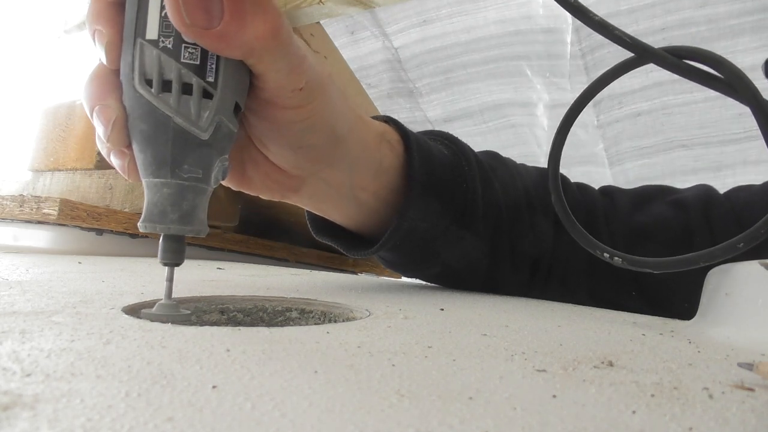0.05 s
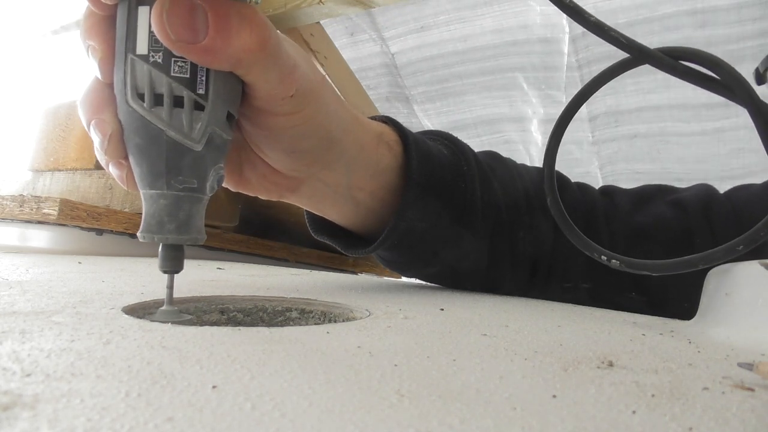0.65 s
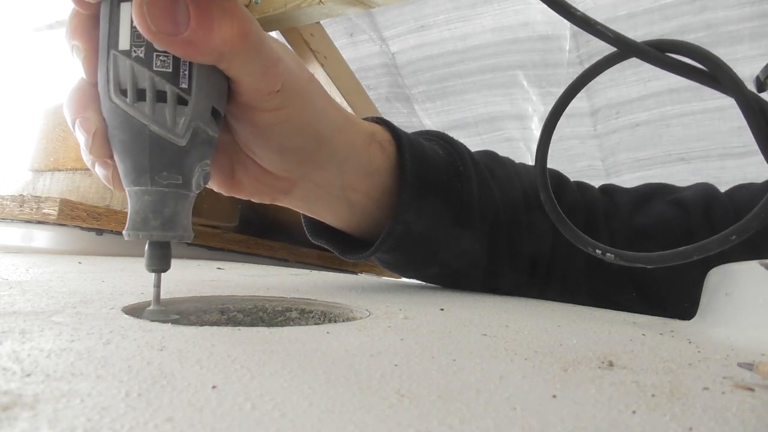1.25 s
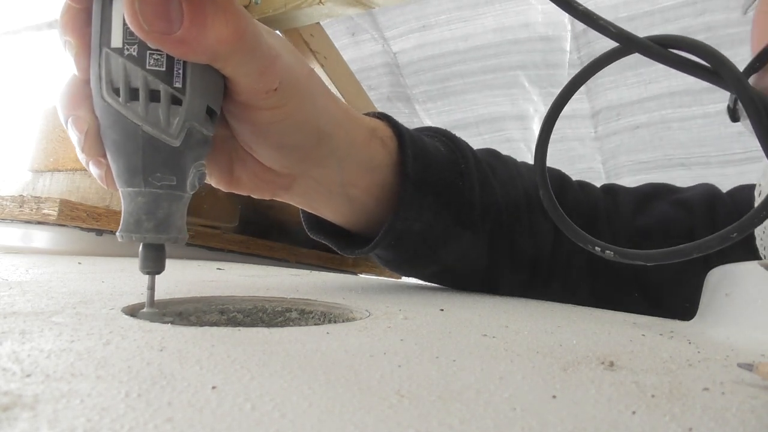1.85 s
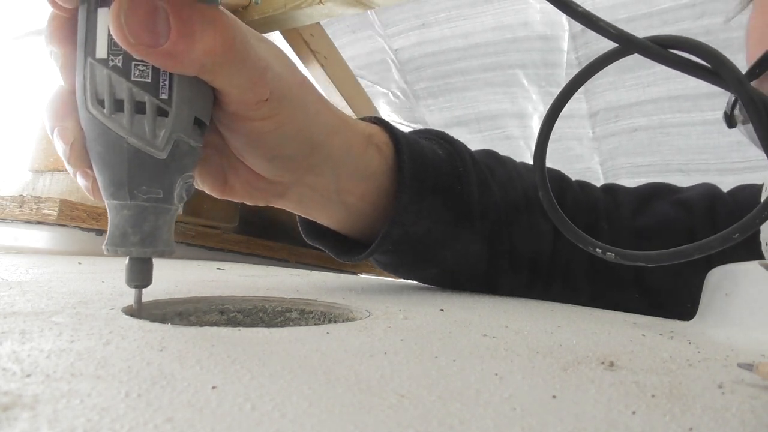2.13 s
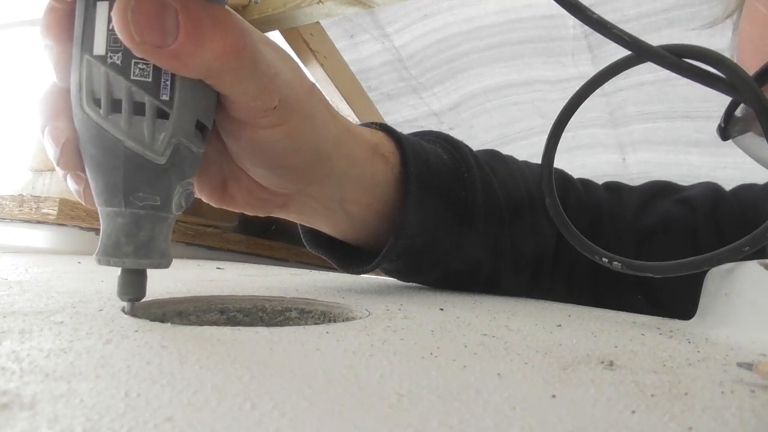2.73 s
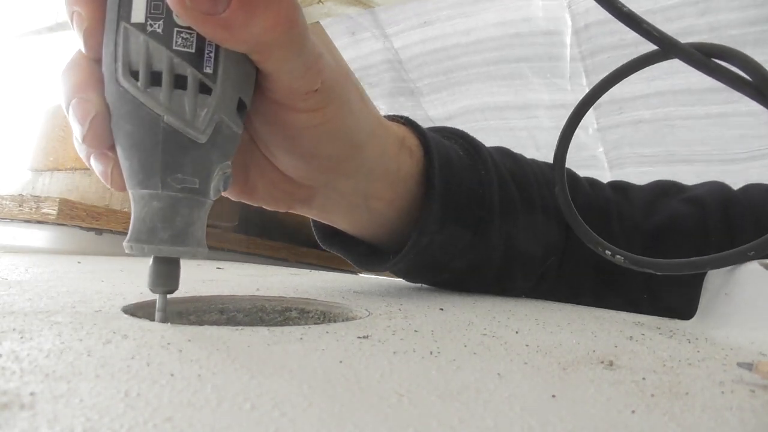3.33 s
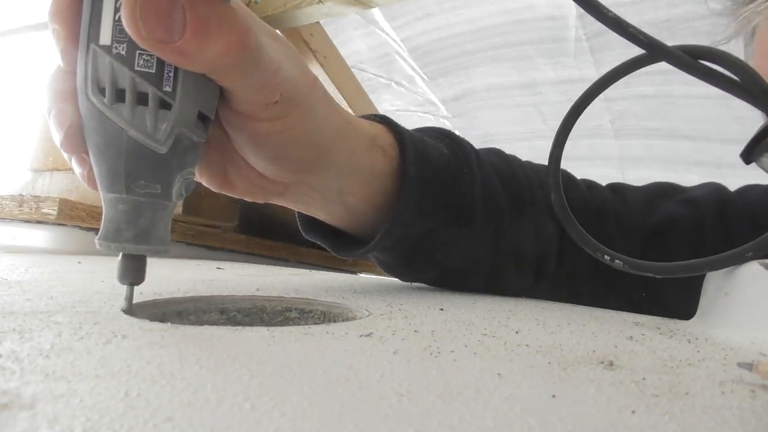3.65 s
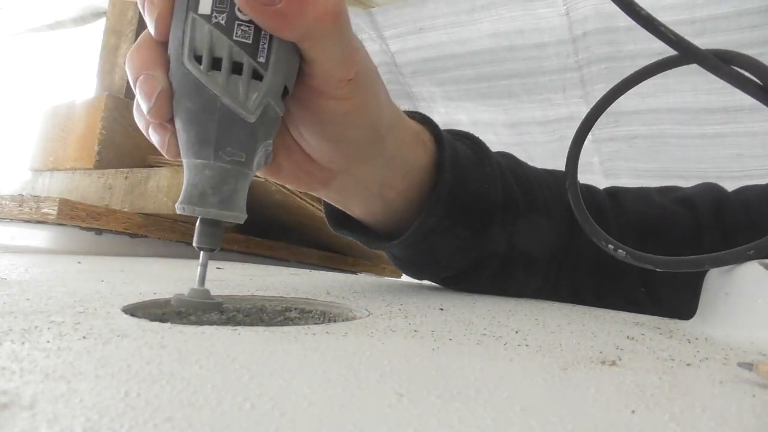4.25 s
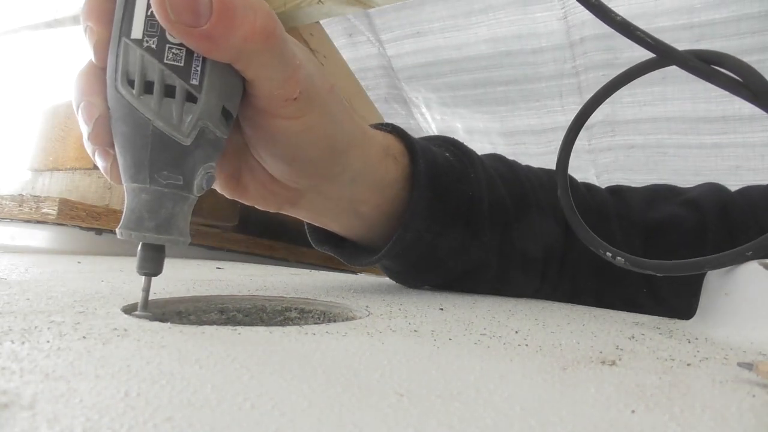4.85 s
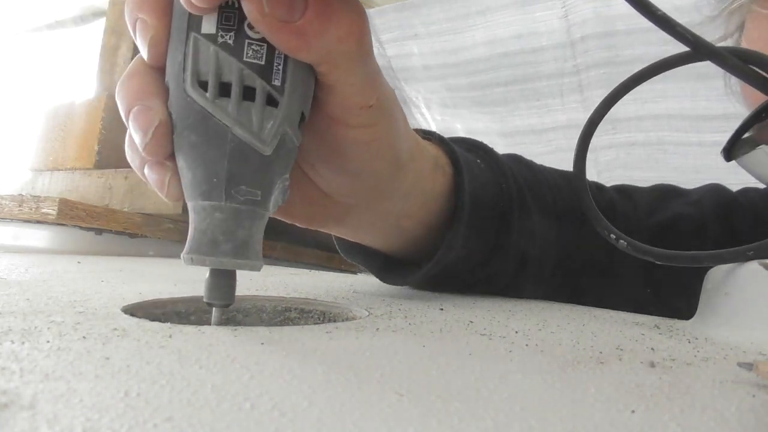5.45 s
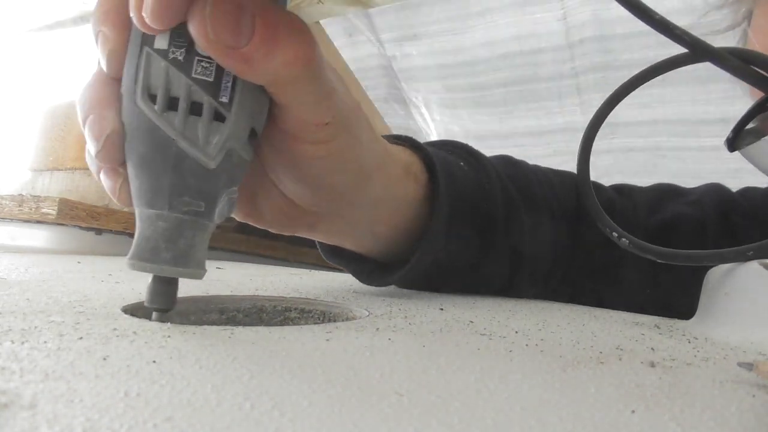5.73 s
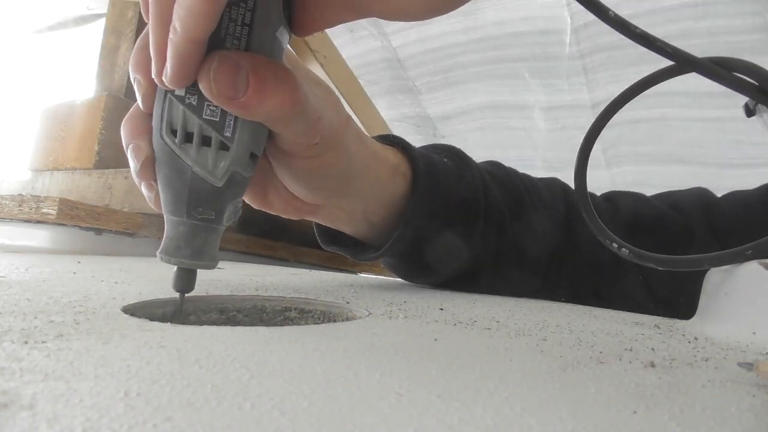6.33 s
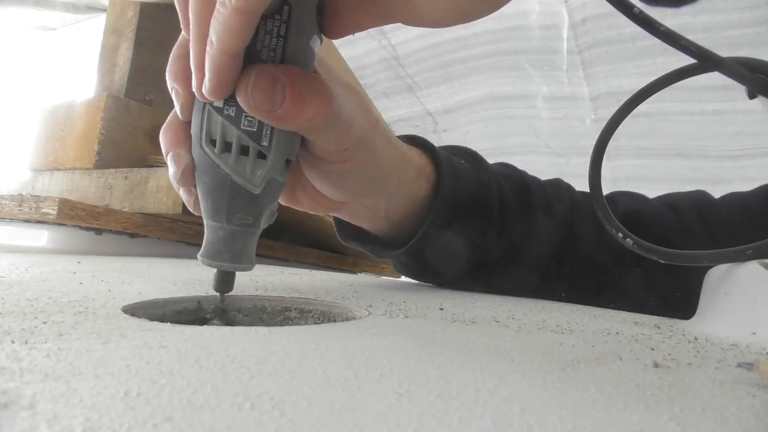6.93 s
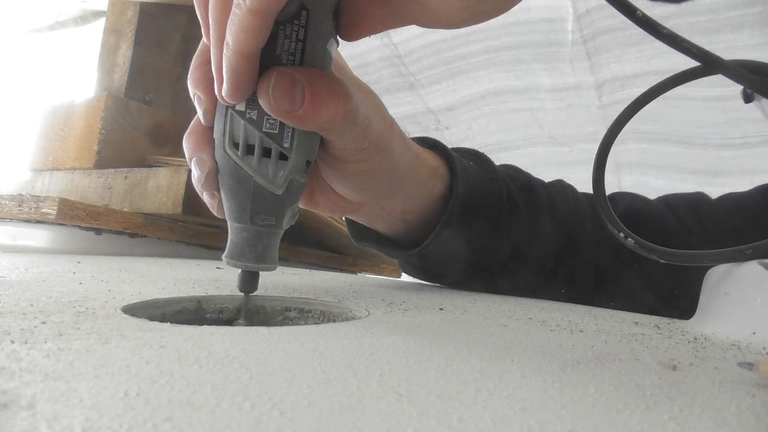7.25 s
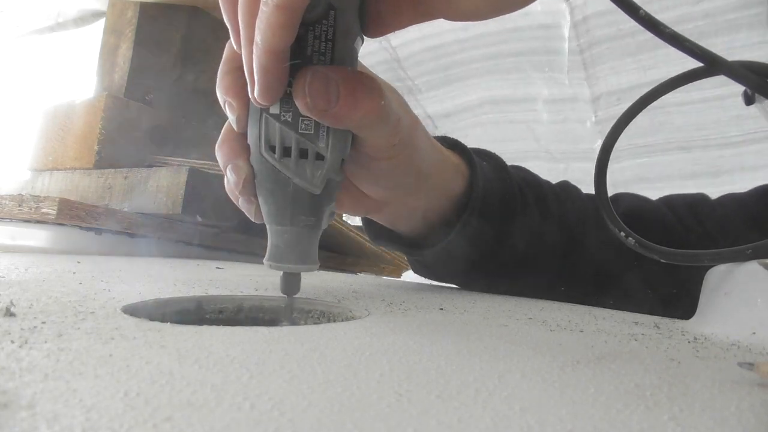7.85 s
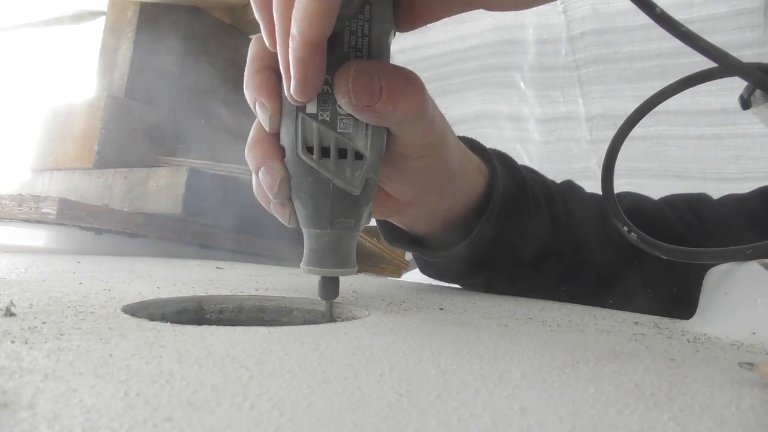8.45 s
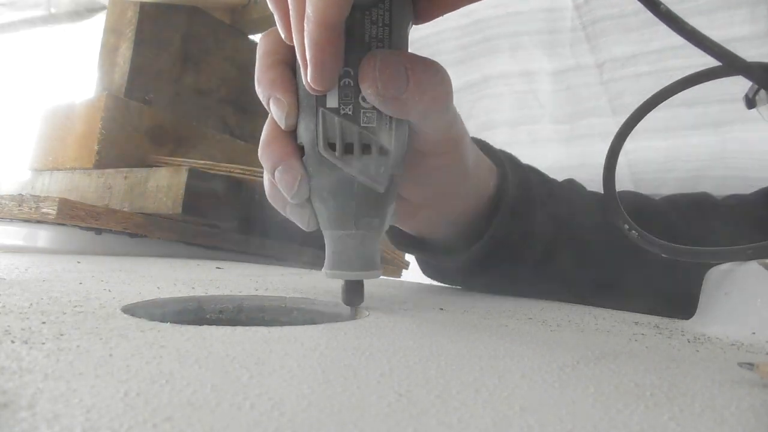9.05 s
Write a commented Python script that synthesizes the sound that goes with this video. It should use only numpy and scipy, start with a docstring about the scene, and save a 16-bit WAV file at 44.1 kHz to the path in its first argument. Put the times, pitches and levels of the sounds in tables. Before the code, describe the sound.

A handheld rotary tool grinds the rim of a hole in fibreglass, with a high motor whine, a low hum and a gritty rasp. Its cooling air rumbles on the close microphone, with a few dull bumps. After nearly two seconds the sound is abruptly sped up, becoming a shrill whistle that sags and screeches at each bite and then recovers, over fine hiss and a fluttering rush of air.

```python
"""Rotary tool grinding fibreglass

A burr grinds the rim of a hole in a deck, the microphone sitting in the tool's cooling air.
The shaft hums and sags under load, the motor whines, the burr rasps grit off the rim.
After 1.73 s time runs eight times faster: the hum becomes a whistle that sags at each bite
and recovers after it, and the air rumble becomes a fluttering rush."""
import sys
import numpy as np
from scipy import signal
from scipy.fft import rfft, irfft
from scipy.io import wavfile
from scipy.ndimage import uniform_filter1d

SR = 44100
rng = np.random.default_rng(int(sys.argv[2]) if len(sys.argv) > 2 else 0)


def pcm_store(signal):
    """Save signal as 16-bit PCM."""
    levels = np.round(np.clip(np.atleast_2d(signal), -1, 1) * 32767)
    wavfile.write(sys.argv[1], SR, levels.astype(np.int16).T)


N = 400428
TIME = np.arange(N) / SR
LEFT_RIGHT = np.array([[1], [-1]])
JUMP_S, SPEED_UP = 1.728, 8  # real time gives way to fast time
MOTOR_ORDER, BEARING_ORDER = 18, 2.55  # cycles per turn of the shaft
FREE_HZ, TOP_HZ = 4031, 15900  # unloaded shaft in fast time; treble limit

# Bites of the burr in fast time; the orders grow by the last column up to their relative levels:
# (time [s], length [s], sag [Hz], first order [dB], second order [dB],
# orders 3, 4 and 6 together [dB], fifth order [dB], growth [dB])
BITES = [(1.78, 0.093, 1560, -37, -41.0, -49, -54, -8), (1.868, 0.11, 1173, -38, -42, -47, -51.0, 2),
         (2.041, 0.19, 1203, -37, -43, -51, -47, -2), (2.21, 0.091, 1350, -34.5, -36, -40, -46, -10),
         (2.327, 0.12, 1082, -34.5, -27, -33.0, -32.5, 8.5),
         (2.436, 0.027, 1547.0, -39.5, -33.5, -42, -49, 12),
         (2.574, 0.198, 1524, -32.5, -32, -33.5, -37.5, 8), (2.776, 0.09, 1447.0, -43, -37.5, -41, -46, -5),
         (2.887, 0.16, 1467, -41, -30, -35, -39.0, 6), (3.081, 0.13, 1530, -44.5, -22.5, -25.5, -30.5, 5.5),
         (3.226, 0.11, 937, -48, -23.0, -25, -27, 5), (3.351, 0.3, 1206.0, -42, -30, -32.5, -31, -1.5),
         (3.694, 0.158, 743, -38, -25.0, -21.5, -29, 3.5),
         (3.842, 0.112, 1950, -45.5, -33.5, -29.5, -38, 1), (4.748, 0.14, 249, -37.5, -43.5, -42, -48.0, 3),
         (5.237, 0.046, 387, -47, -45, -36, -48.0, -3), (5.308, 0.11, 834.0, -51, -37, -47, -41.5, 1),
         (5.424, 0.11, 1695, -42.5, -32, -27, -32.5, 2.5), (5.59, 0.16, 1119, -45.5, -34.5, -42, -40.5, -2),
         (5.733, 0.12, 1004, -42.5, -35, -35, -34.5, 4),
         (5.874, 0.14, 1238, -42, -36.5, -33.5, -37.5, -2.5),
         (6.054, 0.191, 1337, -41.5, -36.5, -37, -37, 0.5), (6.255, 0.064, 1496, -36, -38, -33.5, -37, -3),
         (6.32, 0.21, 1376, -33.0, -31.5, -36, -35.5, 0),
         (6.584, 0.036, 1081.0, -39.0, -33.0, -33.5, -44.0, -16),
         (6.668, 0.15, 1339, -38.5, -33.5, -36, -37.5, 2), (6.879, 0.139, 1355, -32, -29.5, -35, -30.5, 0),
         (7.026, 0.3, 1385, -32, -29.5, -42, -31.0, 1.0), (7.327, 0.12, 1597, -27.5, -28, -51, -45, -7),
         (7.471, 0.054, 1842, -27, -24.5, -41, -34.5, -12), (7.59, 0.116, 1188, -39, -31, -34, -32, 8),
         (7.694, 0.107, 1590, -31.5, -33, -37.5, -38, -2.5), (7.811, 0.1, 1525, -32.5, -33, -36.5, -32, -2),
         (7.925, 0.28, 1499, -32.5, -25, -34, -25.5, 3.5),
         (8.246, 0.34, 1338, -38, -28.5, -32.5, -32.0, 7.5),
         (8.546, 0.043, 1710, -39.5, -33.5, -39, -30.5, -5),
         (8.628, 0.183, 1504, -42, -33.5, -36, -31.5, -1.5),
         (8.817, 0.062, 1800, -33.5, -41.5, -35.0, -33.0, 9),
         (8.881, 0.19, 1682, -40.5, -32.5, -35, -32.5, -1.5)]


def undb(db):
    """Decibels to gain."""
    return 10 ** (np.asarray(db) / 20)


def curve(table):
    """Breakpoints joined into a line over time."""
    return np.interp(TIME, *np.transpose(table))


def at(table, hz, column=1):
    """One column of a table, read on a log-frequency axis."""
    rows = np.array(table, float)
    return np.interp(np.log(np.maximum(hz, 1)), np.log(rows[:, 0]), rows[:, column])


def gate(start, length, rise, fall):
    """Attack, hold and release between 0 and 1."""
    return np.clip(np.minimum((TIME - start) / rise + .5, (start + length - TIME) / fall + .5), 0, 1)


def resonance(hz, centre_hz, width_hz, lift_db):
    """A bell-shaped boost in dB."""
    return lift_db / (1 + (2 * (hz - centre_hz) / width_hz) ** 2)


def walk(rate):
    """Smooth random drift of spread 1, with rate new values a second."""
    hold = max(int(SR / rate), 16)
    steps = rng.standard_normal(N // 16 + 1)[:N // hold + 1]
    drift = uniform_filter1d(uniform_filter1d(np.repeat(steps, hold), hold), hold)[:N]
    return drift / drift.std()


def flutter(depth, rate):
    """Complex gain of mean power 1: uneven contact shakes a tone's level and phase."""
    return (1 + depth * (walk(rate) + 1j * walk(rate))) / np.sqrt(1 + 2 * depth ** 2)


def noise(colour, band=(0, SR), texture=1):
    """Textured noise with a colour (dB as a function of Hz), rms 1 inside the band."""
    hz = np.arange(N // 2 + 1) * SR / N
    bins = rfft(rng.standard_normal(N) * texture) * undb(colour(hz))
    inside = (hz > band[0]) & (hz < band[1])
    return irfft(bins, N) * N / np.sqrt(2 * np.sum(abs(bins[inside]) ** 2))


def background_rumble():
    """A faint bed around 80 Hz, different at each microphone port."""
    ports = [noise(lambda hz: -3 * np.log2((hz + 1) / 80) ** 2) for _ in range(2)]
    return undb(-62.5 + 2 * walk(27)) * np.array(ports)


def thumps(pitch_hz=97, decay_s=0.0044):
    """Air and handling bump the microphone: heavily damped low swings of pressure."""
    # Dull bumps: (time [s], level [dB])
    bumps = [(0.176, -15), (.302, -15.5), (0.402, -16), (1.104, -9.5), (8.43, -33)]
    ages = [(np.maximum(TIME - s, 0), db) for s, db in bumps]
    return sum(undb(db) * np.sin(2 * np.pi * pitch_hz * age) * np.exp(-age / decay_s) for age, db in ages)


def air(pace, band, eddy_db, eddy_hz, mid_db, side_db):
    """Eddies buffet the two ports, mostly in opposite phase; pace scales their pitch and rate."""
    # Turbulence spectrum at pace 1: (frequency [Hz], relative level [dB])
    air_colour = [(6, -20), (16, -12.5), (30, -4), (70, 0.5), (130, -1), (220, -6), (380, -14), (700, -22),
                  (1500, -55)]
    eddies = undb(eddy_db * 2 * np.tanh(walk(eddy_hz * pace) / 2))
    mid, side = (noise(lambda hz: at(air_colour, hz / pace), band, eddies) for _ in range(2))
    return undb(mid_db) * mid + undb(side_db) * side * LEFT_RIGHT


def air_rumble():
    """Real time: cooling air rumbles on the microphone until the stream swings away."""
    away = np.clip((TIME - 1.31) / 0.11, 0, 1)
    rumble = air(0.776, (25, 250), eddy_db=4.5, eddy_hz=24.04, mid_db=1.5, side_db=12)
    return undb(-38.5 - 28 * away) * rumble


def air_rush(speed_hz, travel):
    """Fast time: the rush grows with fan speed and weakens as the tool travels away."""
    # The stream swings onto or off the microphone: (time [s], length [s], change [dB])
    swings = [(1.722, 0.33, -9), (2.052, 0.11, -7), (2.165, 0.12, 4.5), (2.439, 0.1, -3), (2.607, 0.06, -9),
              (2.807, 0.026, 7.5), (3.014, 0.18, 4), (3.207, 0.066, -16), (3.823, 0.14, -4.5),
              (4.168, 0.072, -10), (4.24, 0.086, -0.5), (4.369, 0.66, 2), (5.191, 0.093, 3),
              (5.426, 0.3, -5.5), (5.738, 0.184, 3.5), (6.954, 0.33, -3.5), (8.201, 0.17, -5)]
    swing_db = sum(db * gate(s, length, 0.012, 0.023) for s, length, db in swings)
    gust_db = 10.5 * np.log2(speed_hz / FREE_HZ) - 4.5 * travel + swing_db + walk(30)
    rush = air(SPEED_UP, (200, 1700), eddy_db=4, eddy_hz=75, mid_db=-3 * travel, side_db=4.6)
    return undb(-34.5 + gust_db) * rush


def snags(centre_hz=8650, octaves=0.99, decay_s=0.003):
    """The burr catches on the rim: bright ticks dying in one broad resonance."""
    # Catches: (time [s], level [dB])
    catches = [(2.502, -26), (2.54, -26), (2.824, -27), (3.291, -16)]
    envelope = sum(undb(db) * (TIME >= s) * np.exp(-abs(TIME - s) / decay_s) for s, db in catches)
    return envelope * noise(lambda hz: -12 * (np.log2((hz + 1) / centre_hz) / octaves) ** 2)


def rim_squeal(pitch_hz=2655):
    """Real time: the rim squeals faintly under the burr at first."""
    phase = 2 * np.pi * np.cumsum(pitch_hz * (1 + 0.0036 * walk(13))) / SR
    return np.sin(phase) * undb(-34.5 + 1.3 * walk(12.6)) * gate(0, .82, 0.13, .04)


def shaft_hum(angle):
    """Real time: the shaft's first order dips briefly; its second stands out for a while."""
    first_db = -36 + 0.82 * walk(7.8) - 5 * gate(0.4, 0.093, 0.039, 0.035) - 4.4 * LEFT_RIGHT
    second_db = -44.5 - 4 + 12 * gate(1.0, 0.515, 0.066, 0.049)
    first = np.sin(angle + 0.2 * LEFT_RIGHT) * undb(first_db)
    return first + np.sin(2 * angle + 0.5 * LEFT_RIGHT) * undb(second_db)


def motor_whine(angle, whine_hz):
    """Real time: the motor whines, ringing the housing near one pitch, and the bearing sings."""
    housing_db = resonance(whine_hz, centre_hz=6480, width_hz=160, lift_db=7.5)
    whine = np.sin(MOTOR_ORDER * angle) * undb(-30.5 + housing_db + 1.24 * walk(59.3))
    bearing = np.sin(BEARING_ORDER * angle + walk(26.86)) * undb(-45 + 2 * walk(4.3))
    return whine + bearing


def burr_rasp(angle):
    """Real time: grit tears off once a turn and sets tool and deck ringing."""
    # Rasp spectrum: (frequency [Hz], relative level [dB])
    rasp_colour = [(250, -17), (600, -14), (850, -8.5), (1400, -8), (2300, -7.5), (3500, -9), (4500, -6),
                   (5800, -10), (6900, -4), (9800, -3.5), (11500, -10.5), (13000, -16), (16000, -32)]
    # Resonances of tool and deck: (frequency [Hz], width [Hz], lift [dB])
    rings = [(890, 23, 1), (1077, 59, 6), (1816, 52, 9), (2550, 110, 7.5), (8170, 690, 5)]
    # Extra colour of the difference between the ports: (frequency [Hz], relative level [dB])
    side_colour = [(300, -4), (4400, -44.5), (9000, -34), (14000, -4)]

    def colour(hz):
        return at(rasp_colour, hz) + sum(resonance(hz, *ring) for ring in rings)

    grit = (1 + .22 * np.cos(angle)) * undb(walk(1500) + .5 * walk(70))
    band = (6800, 14000)
    mid = noise(colour, band, grit)
    side = undb(-11) * noise(lambda hz: colour(hz) + at(side_colour, hz), band, grit)
    return (mid + side * LEFT_RIGHT) * undb(-25 + .5 * LEFT_RIGHT)


def grinding():
    """Real time: one turning shaft drives hum, whine and rasp."""
    # Motor pitch under changing load: (time [s], whine [Hz])
    motor = [(0.02, 6000), (0.51, 6115), (0.69, 6280), (0.98, 6480), (1.19, 6490), (1.5, 6115),
             (1.69, 6280)]
    whine_hz = curve(motor)
    shaft_hz = whine_hz / MOTOR_ORDER * (1 + 0.00082 * walk(49.4))
    angle = 2 * np.pi * np.cumsum(shaft_hz) / SR
    return shaft_hum(angle) + motor_whine(angle, whine_hz) + burr_rasp(angle)


def grit_hiss(speed_hz, strain_hz=2420):
    """Fast time: a fine hiss of grit; below the strain speed the burr tears harder."""
    # Hiss before strain adds to it: (time [s], level [dB])
    hiss_levels = [(2.55, -37.5), (2.97, -35), (3.45, -38.5), (4.03, -35.5), (5.3, -35), (6.62, -32.5),
                   (9.06, -32)]
    # Hiss spectrum: (frequency [Hz], relative level [dB])
    hiss_colour = [(500, -31.5), (4500, -2), (7000, 3), (9000, 5.5), (14500, 10.5), (16000, 4)]
    strain = np.clip((strain_hz - speed_hz) / 400, 0, 1)
    grit = undb(1.3 * walk(1800) + .8 * walk(130))
    mid, side = (noise(lambda hz: at(hiss_colour, hz), (8500, 15500), grit) for _ in range(2))
    level_db = curve(hiss_levels) + 6.5 * strain + 0.19 * LEFT_RIGHT
    return (mid + undb(-19) * side * LEFT_RIGHT) * undb(level_db)


def folded_whine(speed_hz, travel, fold_hz=48000):
    """Fast time: the motor whine, now far above hearing, folds down as a faint wandering chirp."""
    pitch_hz = MOTOR_ORDER * speed_hz * (1 + .008 * walk(45)) - fold_hz
    window = np.exp(-((abs(pitch_hz) - 2200) / 2800) ** 2)
    level_db = -51 + 2 * travel + 5 * np.tanh(2 * walk(20))
    return undb(level_db) * window * np.sin(2 * np.pi * np.cumsum(pitch_hz) / SR)


def side_tones(angle, load, judder, travel, ripple_hz=100):
    """Fast time: mains buzz, bearing song and collet rattle between the shaft's orders."""
    # mains torque ripple puts a sideband above and below each order
    mains = 2 * np.pi * ripple_hz * SPEED_UP * TIME
    buzz = 0
    for k in range(1, 6):
        for way in (-1, 1):
            gain = k / 3 * (1 + .2 * way) * flutter(.8, 60)
            buzz += gain * np.exp(1j * (k * angle + way * mains + .5 * walk(260)))
    # the ball bearing swells once a turn
    bearing = flutter(.5, 200) * np.exp(1j * BEARING_ORDER * angle) * (1 + .5 * np.cos(angle))
    # a juddering burr strikes only every other turn, which sounds the half orders
    rattle = 0
    for k in (1, 3, 5):
        gain = judder * (.5 + travel) + travel * k / 10
        rattle += gain * flutter(1, 200) * np.exp(1j * (k + .5) * angle)
    motor = (.95 + .35 * travel) * buzz + 1.2 * (1 + travel) * bearing
    return np.imag(undb(-53) * load * motor + undb(-48) * rattle)


def shaft_speed(entry_hz=2760, stall_s=.04, recover_s=.125, lean_hz_per_s=190):
    """Fast time: each bite drags the shaft down, the hand leans in, the motor recovers on release."""
    # The burr jams for an instant: (time [s], speed dip [Hz])
    jams = [(2.255, 155), (2.455, 215), (2.71, 225), (2.985, 230), (3.19, 100), (5.7, 340), (6.95, 165),
            (7.785, 170)]
    speed_hz = np.full(N, float(entry_hz))
    for start, length, sag_hz, *_ in BITES:
        i = int(start * SR)
        age = TIME[i:] - TIME[i]
        held = np.minimum(age, length)
        settling_hz = (FREE_HZ - speed_hz[i] - sag_hz) * np.exp(-held / stall_s)
        drop_hz = sag_hz + lean_hz_per_s * held + settling_hz
        speed_hz[i:] = FREE_HZ - drop_hz * np.exp((held - age) / recover_s)
    # the rotor's inertia rounds the changes of speed
    speed_hz = uniform_filter1d(uniform_filter1d(speed_hz, size=880), size=880)
    # the motor tops out gently before each new bite
    speed_hz = np.minimum(speed_hz, uniform_filter1d(speed_hz, size=2000))
    return speed_hz - sum(dip_hz * np.exp(-((TIME - s) / .018) ** 2) for s, dip_hz in jams)


def order_levels(swell_s=0.039, linger_s=0.097, fade_s=0.035):
    """Fast time: relative dB of the orders; a bite's screech swells, lingers as the burr lifts, fades."""
    # The burr skips off the rim and the screech breaks: (time [s], length [s], change [dB])
    lifts = [(2.477, 0.016, -9), (3.271, 0.018, -14), (3.859, 0.036, -3), (5.62, 0.035, -11),
             (6.541, 0.04, -11), (6.807, 0.056, -7), (7.413, 0.051, -8.5), (7.54, 0.076, -15),
             (8.199, 0.06, -15), (8.416, 0.14, -7.5), (8.597, 0.028, -7)]
    free_db = np.array([[-36], [-43.5], [-40], [-50]])  # unloaded shaft, orders as in BITES
    levels = free_db * np.ones(N)
    for start, length, _, *bite_db, growth_db in BITES:
        i = int(start * SR)
        age = TIME[i:i + SR] - start
        screech = np.clip(1 - (age - length - linger_s) / fade_s, 0, 1)
        pressed_db = np.array(bite_db)[:, None] + growth_db * (np.minimum(age / length, 1) - 1)
        goal_db = free_db + screech * (pressed_db - free_db)
        takeover = np.minimum(abs(age) / swell_s, 1)
        levels[:, i:i + SR] += takeover * (goal_db - levels[:, i:i + SR])
    lift_db = sum(db * gate(s, length, 0.018, 0.012) for s, length, db in lifts)
    return [db + lift_db + 1.7 * walk(26) for db in levels]


def shaft_whistle(shaft_hz, angle, rough, travel):
    """Fast time: six orders of the shaft, shaken by rough contact with the rim."""
    # How the deck radiates orders 3, 4 and 6: (frequency [Hz], relative level [dB])
    deck_colour = [(7500, 5.5), (9500, 7.5), (10800, 7), (12500, 11), (14500, 0.5), (16000, 9.5)]
    # The whistle at the two ports: (frequency [Hz], left minus right [dB], left lead [rad])
    ports = [(2840, -2, 1), (4200, -1, 0.71), (5200, 0, 0.85), (6000, 2.5, 1), (8000, 4.5, 0.46),
             (13000, 5, 0)]
    first, second, higher, fifth = undb(order_levels())
    radiated = {k: undb(at(deck_colour, k * shaft_hz)) * (k * shaft_hz < TOP_HZ) for k in (3, 4, 6)}
    share = higher / np.sqrt(sum(gain ** 2 for gain in radiated.values()))
    gains = {1: first, 2: second, 5: fifth, **{k: gain * share for k, gain in radiated.items()}}
    # the burr loses contact for a few milliseconds at a time
    skips = undb(-7 * rough * np.maximum(walk(90) - .8, 0))
    chatter = skips * flutter(.17 * rough, 330)
    whistle = 0
    for k, gain in gains.items():
        pan_db = at(ports, k * shaft_hz) - 3 * travel
        phase = k * angle + at(ports, k * shaft_hz, column=2) * LEFT_RIGHT / 2
        shake = chatter * flutter(.2 * rough, 130) * flutter(.08 * k * rough, 600)
        whistle += gain * undb(pan_db * LEFT_RIGHT / 2) * np.imag(shake * np.exp(1j * phase))
    return np.sqrt(2) * undb(0.83) * whistle


def fast_grinding(speed_hz, travel):
    """Fast time: the shaft stumbles as the burr grabs and lets go, less once it runs along the rim."""
    # The burr judders and the screech turns raspy: (time [s], length [s], strength [ratio])
    judders = [(2.441, 0.17, 1.05), (3.664, 0.077, 0.77), (3.848, 0.039, 0.95), (5.65, 0.1, 1.23),
               (6.548, 0.12, 1.33), (6.912, 0.048, 0.89), (7.475, 0.065, 1.2), (8.54, 0.069, 1.14),
               (8.653, 0.058, 1.38)]
    judder = sum(strength * gate(s, length, 0.0092, 0.015) for s, length, strength in judders)
    load = np.clip((4200 - speed_hz) / 1500, .1, 1)
    rough = load * (1 - .55 * travel) + .85 * judder
    jitter = rough * (.004 * walk(110) + .003 * walk(600))
    wander = .005 * load * (1 - .5 * travel) * walk(40)
    shaft_hz = speed_hz * (1 + jitter + wander)
    angle = 2 * np.pi * np.cumsum(shaft_hz) / SR
    tones = shaft_whistle(shaft_hz, angle, rough, travel) + side_tones(angle, load, judder, travel)
    return tones + folded_whine(speed_hz, travel) + grit_hiss(speed_hz)


def scene():
    """Real time crossfades to fast time in 15 ms; late on, the tool travels right along the rim."""
    fast = np.clip((TIME - JUMP_S) / 0.015 + .5, 0, 1)
    travel = np.interp(TIME, [6, 8], [0, 1])
    speed_hz = shaft_speed()
    real_time = air_rumble() + rim_squeal() + grinding()
    fast_time = air_rush(speed_hz, travel) + fast_grinding(speed_hz, travel)
    return background_rumble() + thumps() + snags() + (1 - fast) * real_time + fast * fast_time


def record(dry):
    """A steep low-pass cuts the top."""
    return signal.sosfilt(signal.ellip(10, .2, 80, TOP_HZ, fs=SR, output="sos"), dry)


dry = scene()
out = record(dry)
pcm_store(out)
```